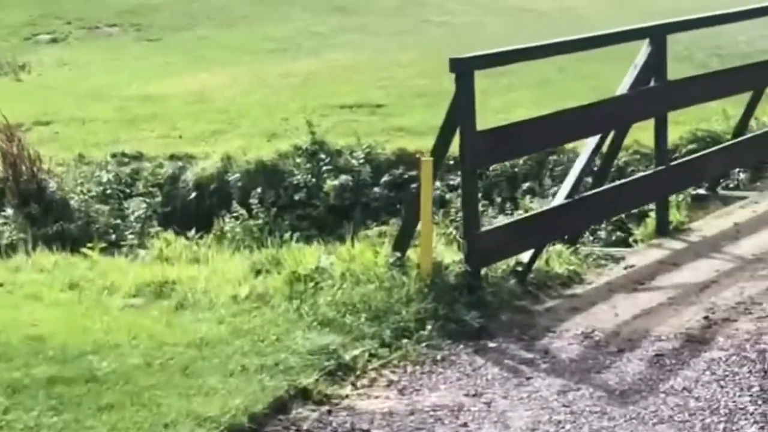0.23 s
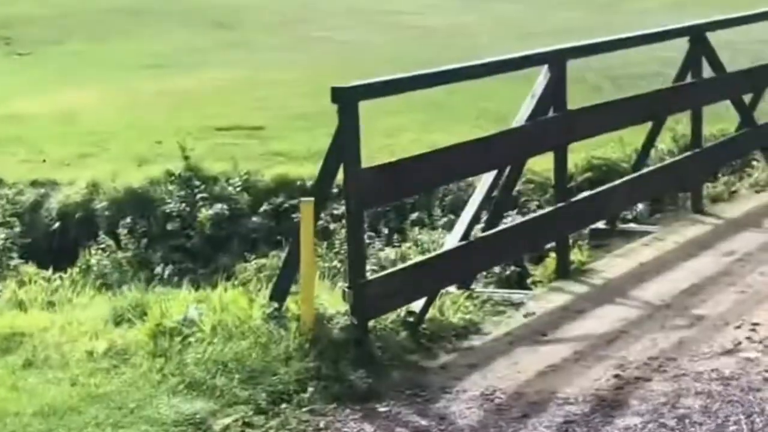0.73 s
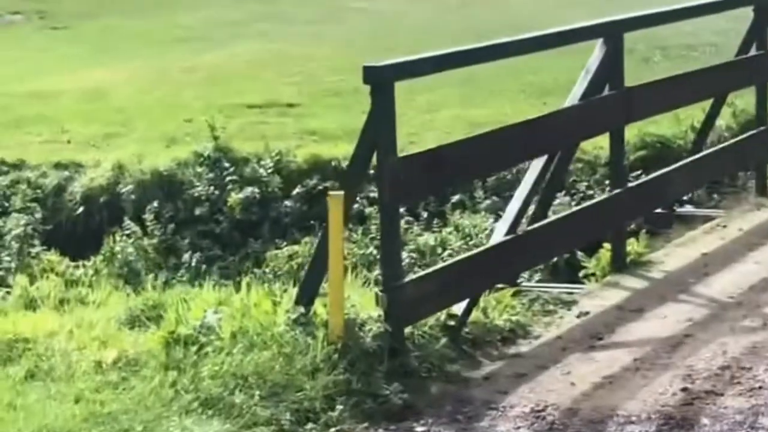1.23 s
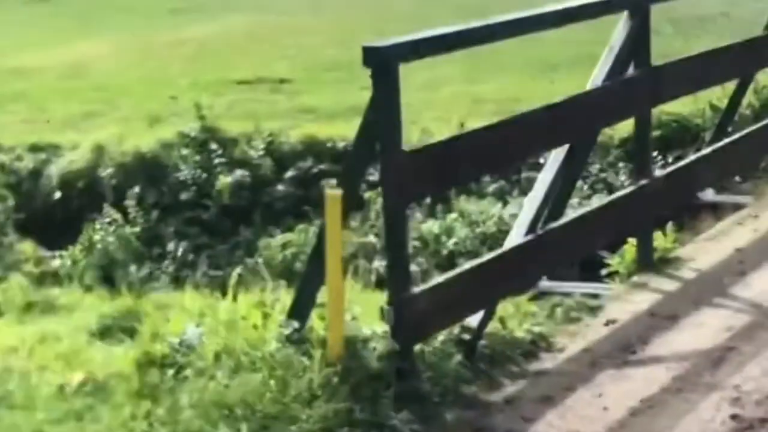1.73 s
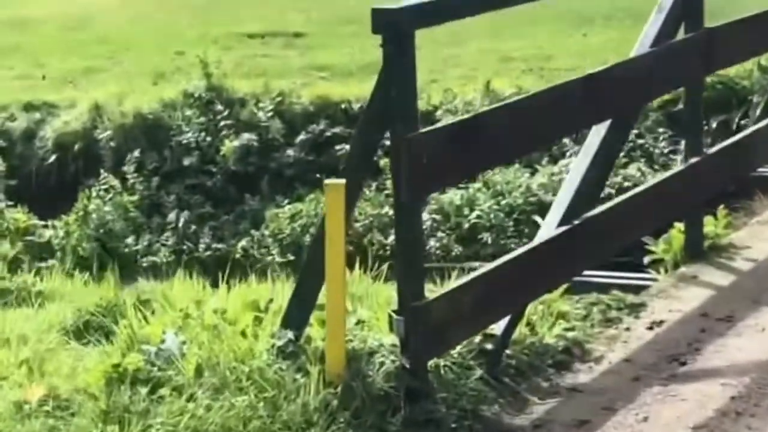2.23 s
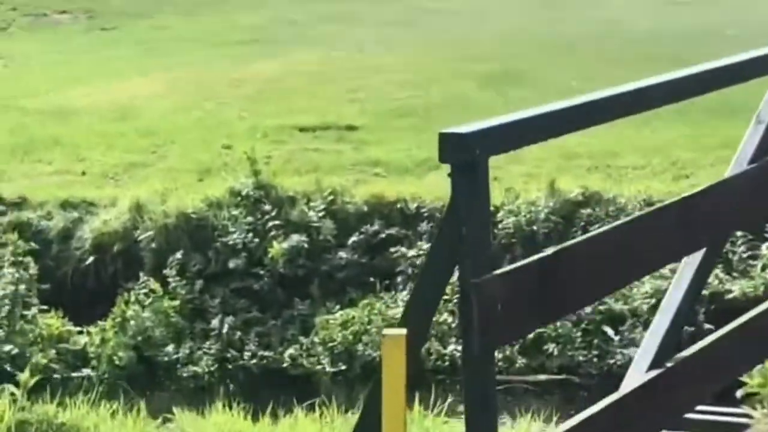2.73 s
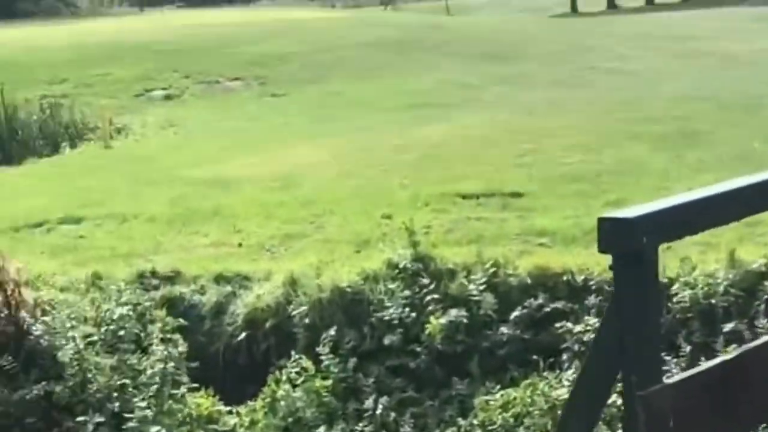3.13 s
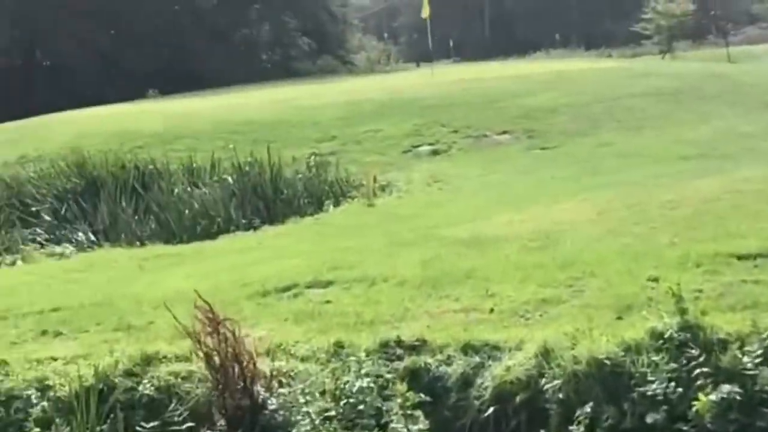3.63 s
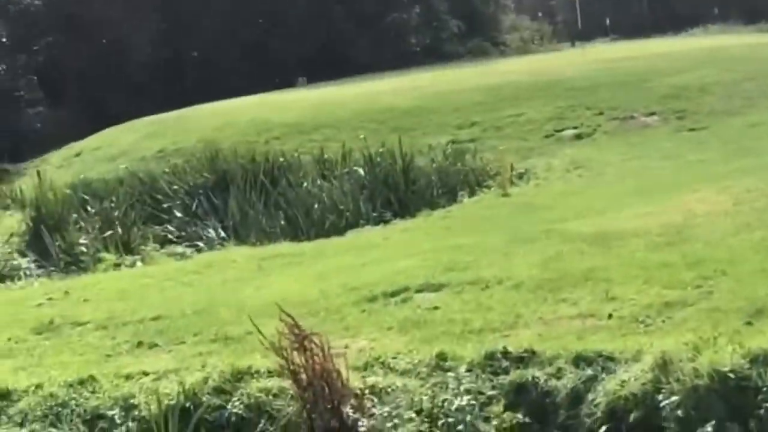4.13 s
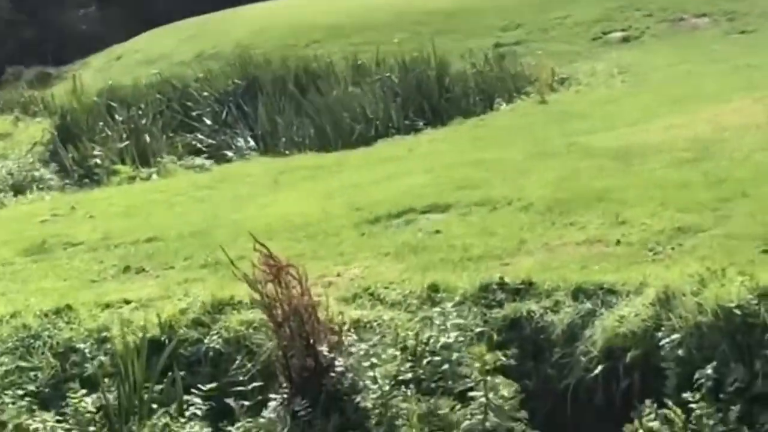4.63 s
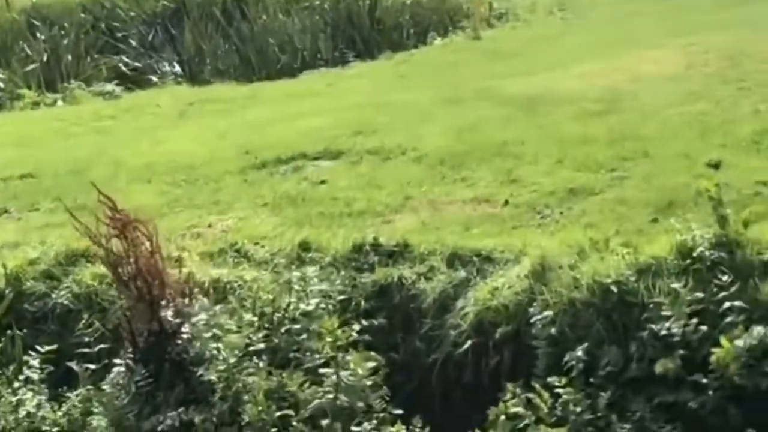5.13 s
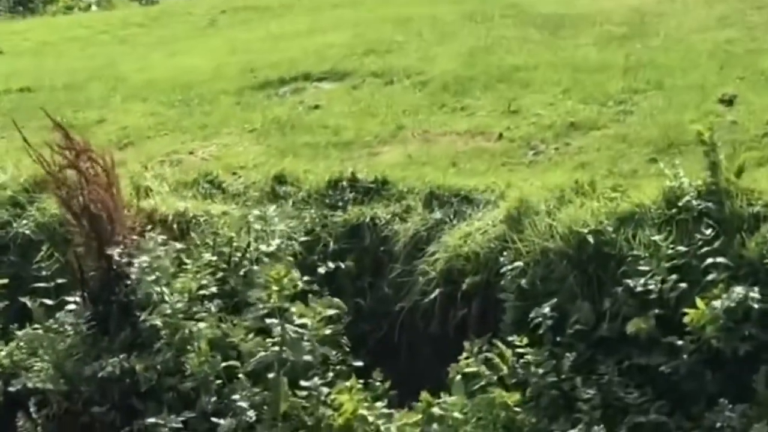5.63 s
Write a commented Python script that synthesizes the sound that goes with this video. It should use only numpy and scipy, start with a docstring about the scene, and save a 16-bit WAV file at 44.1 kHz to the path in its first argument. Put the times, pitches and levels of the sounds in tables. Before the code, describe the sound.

A person walks from a gravel path onto rough grass in an open field, heard close and dry. From 0 to 1 second, small bright stone ticks and fine grit mix with dull low shoe knocks, with a hard crack near 0.8. Sharp snaps follow around 1.1 and 1.4, then a short lull. From 1.8 the crunch thickens, with cracks at 2.2, 2.3 and 2.55, peaking in a dense, loud crackling burst with a shoe scuff at 2.8 to 3.1. After 3.2 it thins to faint ticks and soft shuffles. A duller step with a thud and click lands at 4.3 to 4.4, more scuffs and cracks at 4.8 to 5.1, and a lone snap at 5.6. Low wind buffets the microphone throughout, thumping at 1.4, 2.5, 2.9, 4.4, 4.9 and 5.4 to 5.5, over quiet steady hiss.

```python
"""A gravel path and rough grass in open fields: someone walks from the one onto the other in a light breeze.
Stones crack and grind under the soles, and shoes knock dully on the ground: decaying modes of struck bodies.
Contacts excite the modes singly, and dense random trains of small grains excite them for grit and shuffle.
Gusts buffet the microphone as noise of fluctuating level, over the quiet steady hiss of the fields."""
import sys
import numpy as np
from scipy import signal
from scipy.fft import rfft, irfft
from scipy.io import wavfile
from scipy.ndimage import uniform_filter1d

SR = 44100
rng = np.random.default_rng(int(sys.argv[2]) if len(sys.argv) > 2 else 0)


def attenuation_scalar(level_db):
    """Turn a level in dB into a linear amplitude multiplier (20 dB per decade)."""
    decades = np.asarray(level_db, float) / 20
    return 10 ** decades


def int16_out(signal):
    """Quantize to a 16-bit WAV file."""
    q = np.round(np.clip(np.atleast_2d(signal).T, -1, 1) * 32767)
    wavfile.write(sys.argv[1], SR, q.astype(np.int16))


N = 259431

# stones cracking, loud and faint (a few rows, as at 2.996 and 4.404 s, are a stone striking again about 5 ms
# after a crack): t/s, peak level of the first contact/dB, favoured mode f/Hz, # tilt/(dB per octave)
CRACK_EVENTS = [(0.025, -19, 8600, 13), (0.065, -15.5, 5730, 4), (0.138, -12, 7450, 6),
                (.1785, -11, 10200, -1.5), (0.19, -13, 7250, 4), (.2235, -14.5, 7560, 11),
                (0.313, -16.5, 6000, -1.5), (0.4362, -18.5, 6030, 0), (0.534, -10, 8400, -1.5),
                (0.735, -21.5, 3800, 2), (.797, -2, 3297, 1.5), (0.888, -12, 9800, 10),
                (1.011, -15.5, 6160, 3), (1.092, -12.5, 3400, 5.5), (1.1415, -2.5, 5070, -0.5),
                (1.176, -16.5, 8860, 2), (1.3653, 1.5, 3630, -0.5), (1.3785, -19, 3600, -8),
                (1.4143, -14.5, 7300, 10), (1.435, -22, 3640, -5), (1.4912, -14.5, 9200, -0.5),
                (1.8052, -11, 6330, -7), (1.832, -8, 3900, 2), (1.8551, -4.5, 9700, -2),
                (1.881, -21, 7400, 5), (1.8894, -3.5, 3300, 1), (1.987, -13.5, 8100, -5.5),
                (2.0252, -16, 7240, 2), (2.0364, -9, 7240, 12), (2.1426, -16.5, 6000, 0),
                (2.1902, -8.5, 5870, -1.5), (2.2147, -8.5, 2460, 2.5), (2.2213, -3, 2430, -1),
                (2.303, 1, 4820, 3.5), (2.324, -7, 3960, -3), (2.338, -16, 3660, -6),
                (2.361, -1.5, 10560, 1), (2.4702, -23, 7900, -3), (2.558, 1.5, 3630, 3),
                (2.6326, -10.5, 8500, -5), (2.711, -8, 5600, -2), (2.8052, -3.5, 3800, -1.5),
                (2.817, -3.5, 7200, -2), (2.854, -2.5, 5700, -2), (2.881, -12, 7300, 6),
                (2.8866, 2, 8100, 1.5), (2.8971, 2.5, 5400, 3.5), (2.9173, -9, 3860, 8),
                (2.9905, -9, 2430, -2), (2.996, -14, 2430, -1), (3.021, -9, 3620, 1.5),
                (3.0328, -13, 3480, -2), (3.0407, -14, 2680, -4.5), (3.0659, 1, 3580, 2),
                (3.0803, -11, 3600, -1), (3.1177, -19, 3800, -3), (3.128, -9.5, 3600, 1.5),
                (3.1488, -17.5, 8600, 11), (3.211, -19, 9100, -10), (3.22, -8.5, 8260, -6),
                (3.325, -15, 6200, -3), (3.3426, -12, 5630, 1.5), (3.4059, -20.5, 2340, -2),
                (3.4354, -19.5, 9800, -7.5), (3.645, -17, 7160, 3), (3.701, -20, 2620, 1.5),
                (3.756, -13.5, 3450, 6), (3.7665, -18.5, 3440, -4), (3.801, -28, 8000, 6),
                (3.912, -14.5, 9200, 5), (4.187, -19, 2430, 4), (4.2115, -12.5, 3430, 1),
                (4.2532, -16.5, 3300, -2), (4.348, -11, 4670, 4), (4.399, -1.5, 3370, 4),
                (4.404, -8.5, 3420, -3), (4.438, -23, 7400, 10), (4.5766, -11.5, 2400, 3),
                (4.8629, -5.5, 2530, 1.5), (5.0293, -4, 3360, 3), (5.041, -10, 3700, -3),
                (5.0687, -13, 3650, -0.5), (5.141, -24, 8900, 13), (5.1503, -19, 6940, -3),
                (5.2229, -17, 2520, 4.5), (5.6, -3, 3630, 0.5), (5.7348, -19, 2600, -3)]


def stones(clumps):
    """Impact and granular excitation: single cracks and loose pebbles over the fine crunch of grit."""
    # modes of a struck stone: f/Hz, bandwidth/Hz, relative level/dB
    stone_modes = [(1580, 840, 2), (2430, 325, 1), (2993, 340, -6.5), (3630, 458, 5), (4560, 950, 4),
                   (5600, 610, 5), (7310, 1730, 14), (8380, 820, 8), (9510, 2490, 19), (14300, 940, -6)]
    cracks = blows(stone_modes, CRACK_EVENTS, lift_db=7.14, reach=0.21, after_db=-19, settle_s=0.035, size=2048)

    gain, busy = stir(CRACK_EVENTS, hit_s=0.0068, hit_db=4.5, order=1, fade_s=0.0012)
    crunch_per_s = 1500 * busy * np.exp(0.69 * clumps / busy + 0.74 * lumps(0.002))
    crunch = gain * grains(stone_modes, crunch_per_s, spread_db=3.1, lift_db=15.8, reach=0.86,
                           unlike=2.95, count=32)

    # loose pebbles are less damped: narrower modes ring longer
    pebble_modes = [(hz, 0.29 * width, db) for hz, width, db in stone_modes[1:-1]]
    rattle = grains(pebble_modes, 90 * busy, spread_db=7.0, lift_db=36.0, reach=0.22, unlike=4.8, count=32)
    pebbles = gain * attenuation_scalar(-15.5) * rattle
    return cracks + pebbles + crunch


def shoes(clumps):
    """Impact on a heavily damped body: dull knocks over the low shuffle of soles on soil and grass."""
    # shoe on ground: t/s, peak level of the first contact/dB, favoured mode f/Hz
    knock_events = [(0.014, -27, 270), (.13, -32, 252), (0.385, -16.5, 386), (0.44, -22.5, 910),
                    (.683, -15.5, 400), (0.7658, -18.5, 393), (0.7746, -22, 372), (0.8268, -19.5, 396),
                    (0.8373, -16, 395), (1.0408, -16.5, 575), (1.3806, -22.5, 1160), (1.7541, -20.5, 330),
                    (1.853, -23.5, 260), (2.021, -25, 264), (2.368, -24.5, 220), (2.806, -14, 1305),
                    (2.829, -16, 930), (2.893, -18, 270), (3.402, -18, 385), (3.9808, -16, 372),
                    (4.2509, -15.5, 700), (4.3546, -11, 370), (4.398, -19, 250), (4.911, -20, 626)]
    # modes of shoe and ground: f/Hz, bandwidth/Hz, relative level/dB
    ground_modes = [(246.4, 46, -1), (381.5, 90, -3), (695, 325, 5), (920, 51, -6), (1175, 69, -1.5),
                    (1443, 173, 0), (1875, 103, -5.5), (2600, 200, -14.5), (3310, 530, -6)]
    untilted = [(*row, 0) for row in knock_events]
    knocks = blows(ground_modes, untilted, lift_db=17.0, reach=0.3, after_db=-24.0, settle_s=0.47, size=4096)

    gain, busy = stir(knock_events + CRACK_EVENTS, hit_s=0.0086, hit_db=1, order=2, fade_s=0.0033)
    per_s = 600 * busy * np.exp(0.6 * clumps / busy + 0.6 * lumps(0.015))
    shuffle = gain * grains(ground_modes, per_s, spread_db=3.28, lift_db=18.6, reach=0.31,
                            unlike=1.47, count=24)
    return knocks + shuffle


def blows(modes, rows, lift_db, reach, after_db, settle_s, size):
    """Repeated contact: each blow touches, touches again at once, bounces weakly and chatters briefly."""
    roll_s, roll_db = 0.0008, -8.5  # second touch: typical delay, level re the first
    bounce_s, bounce_db = 0.0056, -19.5
    out, t = np.zeros(N), np.arange(size) / SR
    for s, peak_db, hz, tilt_db in rows:
        own = np.array(modes, float)
        nearest = np.argmin(np.abs(np.log(own[:, 0] / hz)))
        own[nearest, 0] = hz  # the favoured mode replaces its nearest neighbour
        level_db = colour(own, hz, tilt_db, lift_db, reach)
        body = ring(own, level_db, rng.standard_normal((2, len(own))), size // 2)
        body /= np.abs(body).max()

        roll_time, roll_level, bounce_time, bounce_level = rng.standard_normal(4)
        add(out, s, attenuation_scalar(peak_db) * body)
        add(out, s + roll_s * (1 + 0.3 * roll_time) ** 2, attenuation_scalar(peak_db + roll_db + 1.43 * roll_level) * body)
        add(out, s + bounce_s * (1 + 0.094 * bounce_time),
            attenuation_scalar(peak_db + bounce_db + 2.1 * bounce_level) * body)

        # noise falling 60 dB in settle_s; the scaling makes it start near rms 1
        rubbing = rng.standard_normal(size) * attenuation_scalar(-60 * t / settle_s)
        chatter = signal.fftconvolve(rubbing, body)
        chatter /= np.sqrt(np.sum(chatter ** 2) / (settle_s * SR / 14))
        add(out, s, attenuation_scalar(peak_db + after_db) * chatter)
    return out


def grains(modes, per_s, spread_db, lift_db, reach, unlike, count):
    """Granular shot noise: random impulses at a changing rate excite count unlike ticks; a few are large."""
    starts = rng.random(N) < per_s / SR
    strength = attenuation_scalar(spread_db * np.minimum(rng.exponential(1, N), 4)) * starts
    drift = lumps(0.012) + 0.6 * rng.standard_normal(N)  # grains close in time tend to ring alike
    rank = np.argsort(np.argsort(drift))
    kind = rank * count // N  # equal shares of time for every kind of tick
    out = np.zeros(N)
    for k, hz in enumerate(np.geomspace(modes[0][0], modes[-1][0], count)):
        level_db = colour(modes, hz, 0, lift_db, reach)
        tick = ring(modes, level_db, unlike * rng.standard_normal((2, len(modes))), 1024)
        impulses = strength * (kind == k) * rng.choice([-1, 1], N)
        out += signal.oaconvolve(impulses, evened(tick))[:N]
    return evened(out)


def ring(modes, colour_db, chance, size):
    """Modal superposition: damped sines whose decay rate is pi times their bandwidth."""
    hz, width, db = (column[:, None] for column in np.transpose(modes))
    detune, uneven_db = 0.025 * chance[0][:, None], 2.5 * chance[1][:, None]
    t = np.arange(size) / SR
    sign = (-1) ** np.arange(len(modes))[:, None]  # neighbouring modes start in opposite phase
    strength = sign * attenuation_scalar(db + colour_db[:, None] + uneven_db)
    # the contact lasts a moment and each mode builds over half a cycle
    swell = 1 - np.exp(-(t / (0.5 / hz + 0.0001)) ** 2)
    decay = np.exp(-np.pi * width * t)
    return (strength * swell * decay * np.sin(2 * np.pi * hz * (1 + detune) * t)).sum(0)


def colour(modes, hz, tilt_db, lift_db, reach):
    """Modal excitation: where a blow lands tilts the modes and lifts those within reach (octaves) of hz."""
    octaves = np.log2(np.transpose(modes)[0] / hz)
    return tilt_db * np.clip(octaves, -1.5, 1.5) + lift_db * np.exp(-(octaves / reach) ** 2)


def stir(hits, hit_s, hit_db, order, fade_s):
    """Adding powers: scuffs and blows set more grains moving, smoothed by exponential relaxation."""
    # soles grinding: t/s, grit level/dB, shuffle level/dB
    grinding = [(0, -41, -36), (.2, -45, -40), (.4, -46, -45), (.7, -43, -40.5), (1.2, -44.5, -38.5),
                (1.5, -46, -45), (1.95, -44, -36), (2.27, -46.5, -39.5), (2.6, -39.5, -34.5),
                (2.85, -41.5, -38), (3.2, -45, -37), (3.5, -49.5, -41.5), (4.08, -49.5, -46.5),
                (4.38, -40.5, -35), (4.64, -48.5, -43), (4.9, -40.5, -37), (5.3, -46.5, -42.5),
                (5.88, -51, -51)]
    # scuffs of the sole, from a few ms to several tens of ms: t/s, length/s, grit level/dB, shuffle level/dB
    sole_scuffs = [(0.023, 0.028, -32, -31), (0.124, 0.021, -30, -32), (0.343, 0.0059, -26, -35),
                   (0.517, 0.04, -49, -32.5), (0.601, 0.051, -34, -30.5), (0.665, 0.01, -34, -32),
                   (0.858, 0.0063, -30, -33.5), (0.941, 0.0051, -46, -35), (1, 0.005, -29.5, -37),
                   (1.033, 0.0098, -35, -32.5), (1.196, 0.028, -35, -31.5), (1.779, 0.03, -31.5, -31.5),
                   (1.82, 0.05, -34, -30.5), (1.961, 0.049, -34.5, -53), (2.031, 0.013, -38, -28),
                   (2.104, 0.019, -30, -39), (2.159, 0.046, -35.5, -34.5), (2.223, 0.016, -26.5, -27.5),
                   (2.285, 0.021, -38, -43), (2.337, 0.044, -30, -28.5), (2.442, 0.016, -30.5, -26.5),
                   (2.483, 0.0055, -27.5, -45), (2.507, 0.03, -33.5, -39), (2.594, 0.023, -33.5, -27.5),
                   (2.621, 0.013, -28, -33), (2.771, 0.011, -36, -27.5), (2.807, 0.027, -33, -19),
                   (2.896, 0.02, -33, -30.5), (3.035, 0.02, -33, -35.5), (3.194, 0.042, -33.5, -31),
                   (3.285, 0.026, -38, -31), (3.634, 0.007, -41, -31.5), (3.842, 0.0036, -33.5, -40),
                   (3.948, 0.008, -35, -30.5), (3.977, 0.0036, -33, -23), (4.011, 0.0059, -30.5, -26.5),
                   (4.067, 0.018, -44.5, -32.5), (4.176, 0.049, -43, -30), (4.236, 0.022, -42, -29),
                   (4.296, 0.013, -32, -28), (4.343, 0.04, -29.5, -23), (4.681, 0.025, -40.5, -28),
                   (4.82, 0.013, -25.5, -23.5), (4.935, 0.012, -30, -25.5), (5.459, 0.067, -45, -34),
                   (5.642, 0.015, -49, -41)]
    power, slow = np.zeros(N), attenuation_scalar(curve(grinding, order))
    for row in sole_scuffs:
        add(power, row[0], attenuation_scalar(2 * row[order + 1]) * np.ones(max(int(row[1] * SR), 1)))
    for s, *_ in hits:
        burst = attenuation_scalar(hit_db) * slow[round(s * SR)]  # hit_db is relative to the grinding at that moment
        add(power, s, burst ** 2 * np.ones(max(int(hit_s * SR), 1)))
    keep = np.exp(-1 / (fade_s * SR))
    gain = np.sqrt(slow ** 2 + signal.lfilter([1 - keep], [1, -keep], power))
    busy = np.minimum(gain / slow, 4)
    # more grains already sound louder, so their share is taken out of the gain
    return gain / evened(np.sqrt(busy)), busy


def wind():
    """Turbulent pressure noise in a deep and an upper range; gusts climb and drop at steady rates in dB."""
    # breeze on the microphone: t/s, deep level/dB, upper range re deep/dB
    breeze = [(0, -39.5, -9), (.6, -39, 2), (1.3, -47, -13), (1.8, -39, -2), (2.3, -43.5, -28),
              (2.7, -39.5, -5), (3.1, -38, 0), (4.06, -38, -10), (4.4, -24.5, -2.5), (4.63, -37, -29),
              (5.2, -32, -12), (5.45, -34, 6), (5.62, -39.5, -1), (5.88, -34, -16)]
    # single gusts thumping it: t of the top/s, deep level/dB, upper range re deep/dB
    gust_events = [(.41, -30.5, -12), (1.44, -26.5, -17), (1.66, -30.5, -24), (2.49, -23, -27),
                   (2.915, -18, 1), (4.926, -17, -5), (5.11, -23.5, -4.5), (5.39, -24, 1),
                   (5.435, -20, 4.5), (5.511, -17, -3)]
    # turbulence spectrum: f/Hz, relative level/(dB per Hz)
    wind_spectrum = [(20, -7), (45, -2.5), (65, 3.5), (100, -5.5), (180, -16), (300, -24.5), (600, -45),
                     (1500, -110)]
    rise_db_per_s, fall_db_per_s = 187, 203

    rumble = noise(wind_spectrum) * attenuation_scalar(2.9 * lumps(0.0214))
    upper = signal.sosfilt(signal.butter(2, 115, "high", fs=SR, output="sos"), rumble)
    deep = rumble - upper
    deep_power = attenuation_scalar(2 * curve(breeze, 1))
    upper_power = deep_power * attenuation_scalar(2 * curve(breeze, 2))
    for s, db, tilt_db in gust_events:
        late = np.arange(N) / SR - s
        gust_power = attenuation_scalar(2 * (db + np.minimum(rise_db_per_s * late, -fall_db_per_s * late)))
        deep_power = deep_power + gust_power
        upper_power = upper_power + gust_power * attenuation_scalar(2 * tilt_db)
    return np.sqrt(deep_power) * evened(deep) + np.sqrt(upper_power) * evened(upper)


def air():
    """Broadband ambient noise of slightly uneven level: the faint hiss of leaves and distance."""
    # hiss spectrum: f/Hz, relative level/(dB per Hz)
    air_spectrum = [(100, -47), (260, 7), (580, 6.5), (1170, 6.5), (2000, -4), (3200, -6.5), (8500, -5.5),
                    (11000, -8), (13400, -26), (14800, -10), (16200, -45)]
    return attenuation_scalar(-46 + 0.43 * lumps(0.012)) * noise(air_spectrum)


def noise(points):
    """Spectral shaping: white noise weighted by a spectrum in dB per Hz, at rms 1."""
    f, db = np.transpose(points)
    hz = np.fft.rfftfreq(N, 1 / SR)
    weight = attenuation_scalar(np.interp(np.log(hz + 1), np.log(f + 1), db))
    return evened(irfft(rfft(rng.standard_normal(N)) * weight, N))


def lumps(seconds):
    """Low-pass random fluctuation: white noise averaged twice over the given time, at rms 1."""
    size = max(int(seconds * SR), 1)
    once = uniform_filter1d(rng.standard_normal(N), size)
    return evened(uniform_filter1d(once, size))


def curve(rows, order):
    """Linear interpolation: one column of a table over time, at every sample."""
    rows = np.asarray(rows)
    return np.interp(np.arange(N) / SR, rows[:, 0], rows[:, order])


def evened(x):
    """Normalization by root mean square: scales to rms 1."""
    return x / np.sqrt(np.mean(x ** 2) + 1e-20)


def add(mix, s, sound):
    """Linear superposition: lays a sound into the mix at s seconds."""
    part = mix[round(s * SR):][:len(sound)]
    part += sound[:len(part)]


def scene():
    """Superposition of all sources at one microphone; grit and shuffle share the same clumps in time."""
    clumps = lumps(0.009)
    return (stones(clumps) + shoes(clumps) + wind() + air())[None]


def low_pass(x):
    """Removes everything above the highest recorded frequency."""
    return signal.sosfilt(signal.butter(12, 16810, fs=SR, output="sos"), x)


def record(dry):
    """Band limiting and saturation: the microphone loses top and deepest bass; the hardest cracks flatten."""
    soft = signal.sosfilt(signal.butter(2, 11500, fs=SR, output="sos"), dry)
    cut = signal.sosfilt(signal.butter(2, 35, "high", fs=SR, output="sos"), soft)
    held = cut / (1 + (cut / 0.85) ** 4) ** 0.25  # smooth limit at 0.85 of full scale
    edge = signal.firwin(255, 16500, window=("kaiser", 9), fs=SR)[None]  # steep low-pass
    finished = signal.oaconvolve(held, edge, "same")
    return low_pass(finished)


dry = scene()
out = record(dry)
int16_out(out)
```